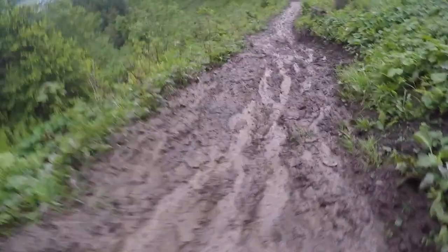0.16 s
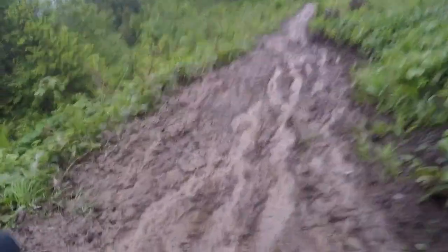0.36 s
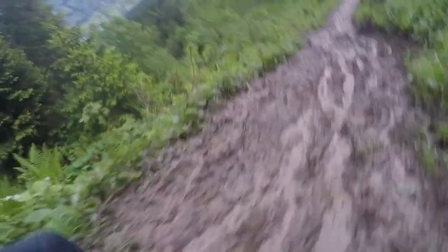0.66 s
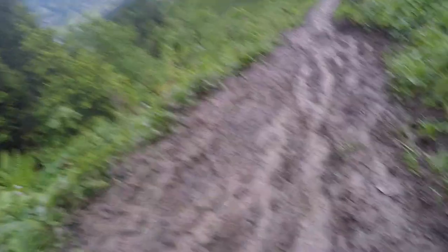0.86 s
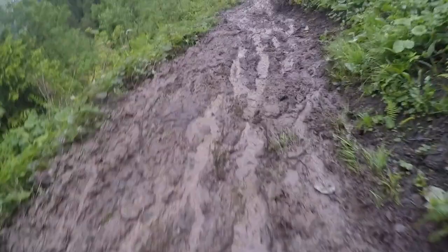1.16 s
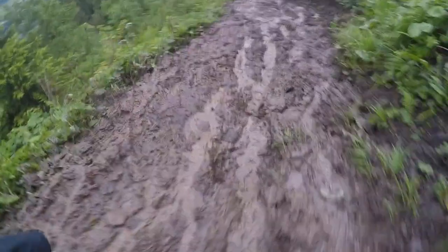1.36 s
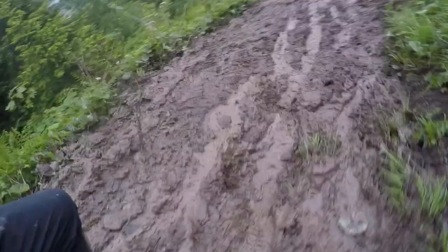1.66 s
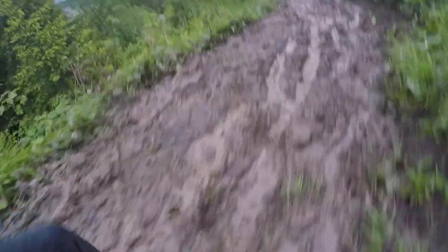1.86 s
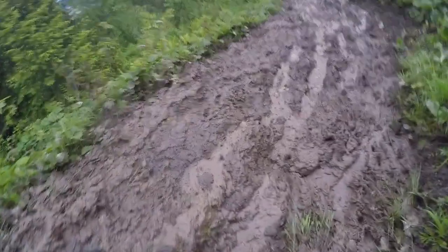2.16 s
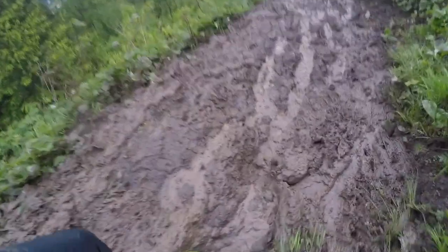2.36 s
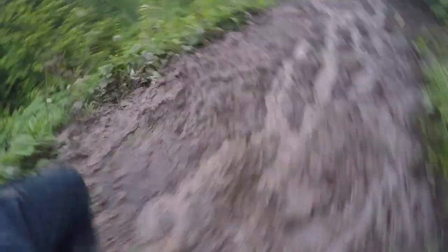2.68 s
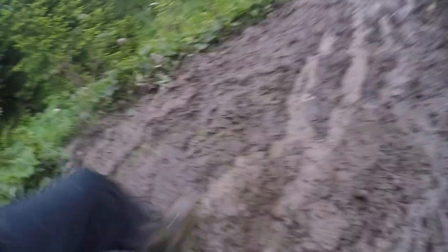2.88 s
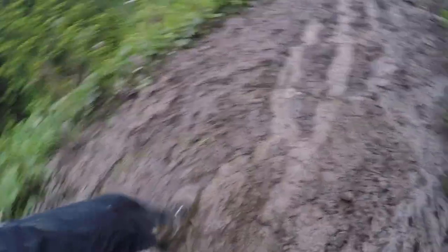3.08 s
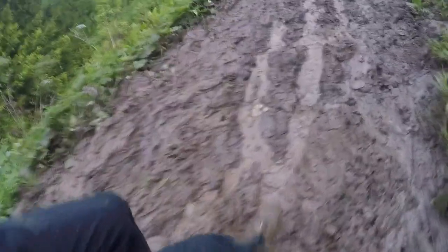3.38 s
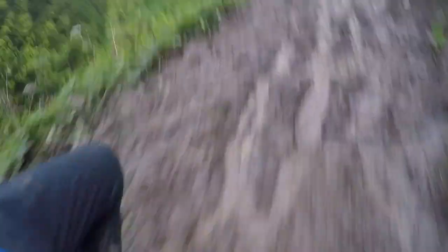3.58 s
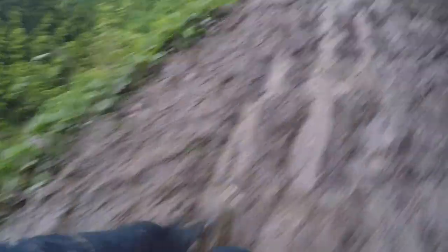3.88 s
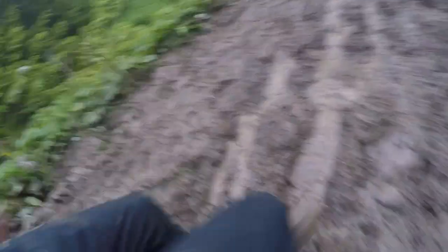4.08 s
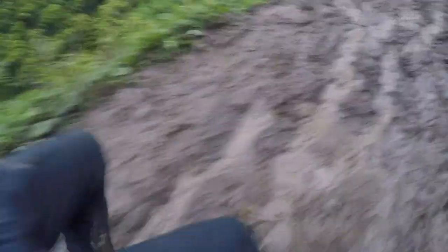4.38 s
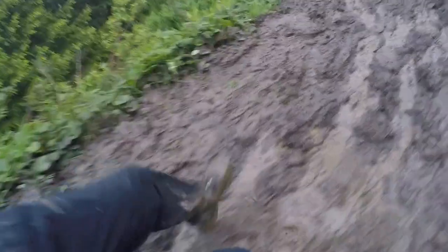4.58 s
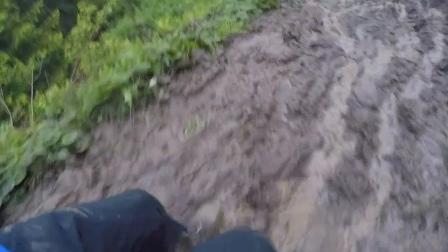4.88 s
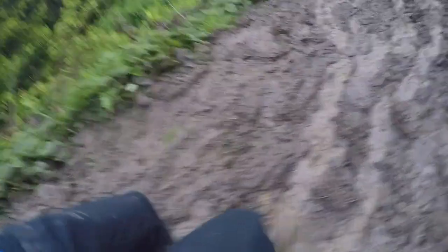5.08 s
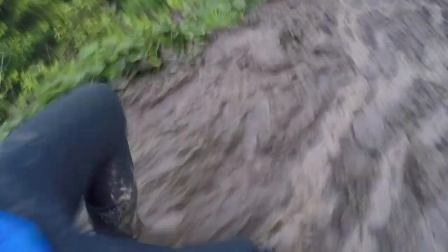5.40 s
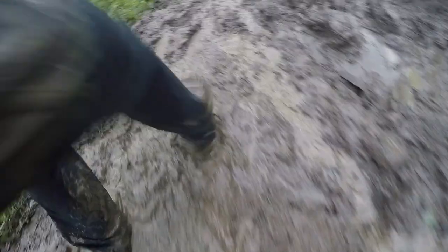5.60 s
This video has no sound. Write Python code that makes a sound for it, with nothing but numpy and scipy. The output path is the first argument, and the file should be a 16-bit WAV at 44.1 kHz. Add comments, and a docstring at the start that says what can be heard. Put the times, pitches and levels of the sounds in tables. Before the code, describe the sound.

Close mono sound from a body-worn camera in a plastic housing, outdoors, without echo. Quiet moving air, faint irregular wet ticking and a barely audible thin whine run throughout. A soft mud step with small hollow pops comes at 0.3 s, then tiny clicks and a light drag near 1.0. A crisp heel-and-sole squelch lands at 1.5, with a strong low plop at 1.6. From 1.95 to 2.25 a jacket rubs the housing, drumming low and swishing faintly, amid small squirts. A sharp wet slap hits at 2.7, and a soft drag follows at 3.1. Steps then quicken: 3.6, a hard short slap at 3.9 with a deep pop, 4.3, 4.8 and 5.4. Each sprays fine bubbles and fizz, pops trapped air in short falling tones, churns dully and jolts the camera with a low thud, then thins into sticky crackles. A last click comes at 5.6.

```python
"""Quick steps through wet mud, heard by a body-worn camera in a plastic housing.
Each boot squeezes out a spray of tiny bursting bubbles made of short rising sines, with noise as fizz.
Trapped air pops as falling tones with noisy snaps; the body's weight churns the mud and jolts the camera.
Softer are single wet clicks, a faint irregular ticking that rises around each step, moving air and a
thin whine. A jacket rubs once along the housing: random slips drum low while noise swishes."""
import sys
import numpy as np
from scipy.fft import rfft, irfft, next_fast_len
from scipy.io import wavfile
from scipy.ndimage import map_coordinates

SR = 44100
rng = np.random.default_rng(int(sys.argv[2]) if len(sys.argv) > 2 else 0)


def store_pcm(level_fs):
    """Save levels as 16-bit WAV."""
    pcm = np.round(np.clip(level_fs, -1, 1) * 32767).astype(np.int16)
    wavfile.write(sys.argv[1], SR, np.atleast_2d(pcm).T)


N = 253134

# What the plastic housing lets through of the wet sounds. Each row: frequency in Hz, gain in dB.
HOUSING = [(200, 3.5), (550, 6.5), (850, -3), (1200, -2.5), (1400, -7), (1680, 4), (2300, -5.5), (2650, 3),
           (3300, -8.5), (4600, 3), (5700, 5), (7300, -9.5), (9000, -14), (14500, -23)]
# A step is heel strike, sole slap, then the body's weight; levels are those before any filter or flutter.
# Each row: heel start in seconds, heel level in dB, heel swell in seconds, air pocket under the heel in dB,
# sole start in seconds, sole level in dB, sole swell in seconds, sole t60 in seconds, bubble pitch in Hz,
# fizz in dB relative to the sole, ooze level in dB, fullest load in seconds after the heel,
# release width in seconds, churn level in dB, jolt level in dB.
STEPS = [(.329, -35, .002, -39, .336, -34.5, .014, 0.12, 2380, -12.5, -48, .03, 0.092, -43, -45),
         (1.48, -24.5, .0011, -27, 1.5, -26, 0.0049, 0.081, 1950, -19, -46, 0.087, 0.086, -38.5, -38.5),
         (2.705, -25, .0023, -16.5, 2.723, -20.5, .0051, 0.025, 2230, -16, -41.5, 0.041, 0.071, -38, -38.5),
         (3.594, -37.5, 0.0037, -23, 3.608, -31.5, 0.012, 0.12, 3520, -14, -49, 0.048, .11, -37, -41.5),
         (3.901, -38.5, .004, -28, 3.9275, -20.5, 0.0011, .016, 4540, -16.5, -46, .1, 0.034, -38, -40.5),
         (4.305, -41.5, .005, -38, 4.326, -33.5, 0.024, 0.061, 3570, -18.5, -47, .095, 0.062, -37, -39),
         (4.807, -34.5, .0007, -26, 4.843, -29, .0063, 0.099, 3870, -22, -56, 0.14, 0.024, -44.5, -37.5),
         (5.401, -44, 0.0045, -22, 5.443, -26.5, .022, .05, 3470, -22, -45, 0.086, 0.062, -36.5, -35)]
# Soft drags: a swinging boot skims the mud, or a trouser leg brushes.
# Each row: start in seconds, spray level in dB, swell in seconds, churn level in dB.
DRAGS = [(.992, -45.5, .02, -54), (1.05, -44.5, 0.029, -46.5), (3.07, -42, .016, -55),
         (4.58, -50, .035, -57), (5.325, -52, .035, -41.5)]
BUILD_UP_S = .04  # width of the rise as the weight comes onto a foot


def amp(db):
    """Amplitude factor of a level in dB."""
    return 10 ** (np.asarray(db) / 20)


def unit(x):
    """Scale a sound to rms 1."""
    return x / np.sqrt(np.mean(x ** 2) + 1e-20)


def clock(length):
    """Sample times in seconds of a short sound."""
    return np.arange(int(length * SR)) / SR


def add(track, s, sound):
    """Lay a sound into a track at time s."""
    part = track[max(round(s * SR), 0):][:len(sound)]
    part += sound[:len(part)]


def wobble(rate, size=N):
    """A smooth random curve, rate knots a second."""
    return map_coordinates(rng.standard_normal(2048), [np.arange(size) * rate / SR], mode="wrap")


def swelling(t, s, build_up, release):
    """A smooth rise to 1 at time s and a smooth fall, each half a bell curve of its own width."""
    width = np.where(t < s, build_up, release)
    return np.exp(-.5 * ((t - s) / width) ** 2)


def colour(x, points):
    """Causal (minimum-phase) filter whose gain follows (Hz, dB) points."""
    m = 2 * next_fast_len(N // 2 + SR // 4)
    hz, db = np.transpose(points)
    gain = amp(np.interp(np.log(np.fft.rfftfreq(m, 1 / SR) + 1), np.log(hz), db))
    # folding the cepstrum onto positive times keeps the filter from sounding early
    cepstrum = irfft(np.log(gain))
    cepstrum[1:m // 2] *= 2
    cepstrum[m // 2 + 1:] = 0
    return irfft(rfft(x, m) * np.exp(rfft(cepstrum)))[:N]


def noise(points):
    """Coloured noise of rms 1."""
    return unit(colour(rng.standard_normal(N), points))


def bubbles(length, count, pitch_hz, scatter, cycles, size_db):
    """Tiny bubbles at random times, each a few dying cycles that rise in pitch; rms 1."""
    t = clock(.012)
    samples = int(length * SR)
    start = rng.integers(0, samples, (count, 1))
    pitch, size = rng.standard_normal((2, count, 1))
    hz = np.clip(pitch_hz * np.exp(scatter * pitch), 300, 14000)
    age = np.minimum(hz * t / cycles, 2)  # 1 when the bubble has died by 60 dB
    loudness = amp(size_db * np.minimum(size, 1.6))
    decay = np.exp(-np.log(1000) * age)
    grains = loudness * decay * np.sin(2 * np.pi * hz * t * (1 + .08 * age))
    places = start + np.arange(len(t))
    return unit(np.bincount(places.ravel(), grains.ravel(), samples)[:samples])


def background():
    """Moving air, faint irregular ticking that rises around each step, and the camera's thin pulsing whine."""
    # Moving air around the camera. Each row: frequency in Hz, relative level in dB per Hz.
    air_spectrum = [(12, -31), (20, 0), (54, -2), (166, -15), (195, -12), (224, -13), (376, -8.5),
                    (441, -12), (508, -15), (596, -19.5), (1400, -31), (1820, -48), (3080, -120)]
    # Hiss of the wet ground. Each row: frequency in Hz, relative level in dB per Hz.
    hiss_spectrum = [(760, -31), (1300, -20), (1430, -0.5), (1650, 10), (1850, 2.5), (2010, 4), (2600, 4),
                     (3310, -3.5), (3980, -2.5), (4950, -1), (5670, 1.5), (7420, -9.5), (10700, -13),
                     (12100, -10.5), (15500, -20.5)]
    air_db, rest_db = -48, -61  # moving air; the wet ground at rest
    stirred_db, settle_s = 3.5, .21  # the ground's rise around each sole slap, width of its settling
    ticks_db = -3.5  # ticking relative to the hiss
    t = np.arange(N) / SR
    stirred = sum(swelling(t, sole_s, BUILD_UP_S, settle_s) for _, _, _, _, sole_s, *_ in STEPS)
    hiss_db = rest_db + stirred_db * stirred
    air = amp(air_db + 1.86 * wobble(21.98)) * noise(air_spectrum)
    hiss = amp(hiss_db + 1.1 * wobble(24)) * noise(hiss_spectrum)
    ticks = bubbles(N / SR, count=1500, pitch_hz=3500, scatter=.5, cycles=26, size_db=5.5)
    ticking = amp(hiss_db + ticks_db) * unit(colour(ticks, HOUSING))
    pulse = 1 + 2.0 * np.sin(2 * np.pi * 30 * t)
    whine = amp(-82.5) * pulse * np.sin(2 * np.pi * 12408 * t)
    return air + hiss + ticking + whine


def weight():
    """Under load the mud churns dully and crackles, and the body's jolt rocks the camera on its strap."""
    # Dull churning of loaded mud. Each row: frequency in Hz, relative level in dB.
    churn_spectrum = [(40, -20), (120, -12), (250, -2), (380, 2.5), (600, -7.5), (900, -25.5), (1500, -29),
                      (4000, -69)]
    # Low thud of the jolted camera. Each row: frequency in Hz, relative level in dB.
    jolt_spectrum = [(12, -16), (28, -9), (50, 1), (80, -15.5), (160, -6.5), (500, -60.5)]
    drag_width_s = .033  # width of the rise and fall of a soft drag
    t = np.arange(N) / SR
    churn, jolt = np.zeros(N), np.zeros(N)
    shake = noise(jolt_spectrum)
    for heel_s, *_, delay, release, churn_db, jolt_db in STEPS:
        load = swelling(t, heel_s + delay, BUILD_UP_S, release)
        rock = np.sin(2 * np.pi * (rng.uniform(24, 48) * t + rng.random()))
        churn += amp(churn_db) * load
        jolt += amp(jolt_db) * load * (1.38 * rock + 1.16 * shake)
    for s, _, swell, churn_db in DRAGS:
        churn += amp(churn_db) * swelling(t, s + swell, drag_width_s, drag_width_s)
    dull = noise(churn_spectrum) * amp(2.7 * wobble(90) - 2.5)
    crackle = bubbles(N / SR, count=2500, pitch_hz=2790, scatter=.55, cycles=16, size_db=4)
    crackle = colour(crackle, HOUSING)
    gurgle = bubbles(N / SR, count=1200, pitch_hz=565, scatter=.39, cycles=8.5, size_db=6.0)
    return churn * (dull + amp(-15) * crackle + amp(-15) * gurgle) + jolt


def pockets():
    """Heel and sole each trap air, and the weight pops a few more: (s, dB, nominal pitch Hz, t60 s)."""
    # Large air pockets that burst on their own.
    # Each row: start in seconds, level before the onset and decay in dB, nominal pitch in Hz, t60 in seconds.
    lone_pockets = [(.318, -20, 302, 0.016), (.4539, -15.5, 567, 0.0052), (1.138, -31, 360, .036),
                    (1.152, -27.5, 340, .041), (1.58, -25, 425, 0.038), (1.598, -7.5, 272, .012),
                    (1.603, -13.5, 530, 0.013), (2.279, -22, 468, 0.012), (2.696, -22, 255, 0.048),
                    (2.812, -21, 388, 0.038), (3.237, -32.5, 373, 0.042), (3.676, -12.5, 343, 0.012),
                    (3.688, -18, 323, .047), (3.931, -7, 248, 0.014), (4.02, -24.5, 433, 0.032),
                    (4.396, -11, 490, 0.0079), (4.407, -16.5, 397, 0.045), (4.479, -23, 474, 0.021),
                    (4.93, -17.5, 505, .019), (5.473, -13.5, 450, 0.014)]
    pocket_hz, pocket_t60_s = 368.4, .045  # air trapped by a boot
    sole_pocket_db = 3  # under the sole, relative to the slap
    # stray pockets under load: level over the churn, spread in time, spread of log pitch
    stray_db, stray_spread_s, stray_scatter = 5.5, .03, .23
    rows = list(lone_pockets)
    for heel_s, _, _, pocket_db, sole_s, sole_db, swell, *_, delay, _, churn_db, _ in STEPS:
        rows.append((heel_s, pocket_db, pocket_hz, pocket_t60_s))
        rows.append((sole_s + swell / 2, sole_db + sole_pocket_db, pocket_hz, pocket_t60_s))
        for when, pitch in rng.standard_normal(size=(3, 2)):
            s = heel_s + delay + stray_spread_s * when
            hz = pocket_hz * np.exp(stray_scatter * pitch)
            rows.append((s, churn_db + stray_db, hz, pocket_t60_s / 2))
    return rows


def plops():
    """An air pocket rings briefly, falling in pitch as it opens; small pockets snap the mud skin harder."""
    # Tearing of the mud skin. Each row: frequency in Hz, gain in dB.
    skin = [(100, 5), (600, 3), (1100, -3), (1400, -12), (1700, -5), (2500, -23), (6000, -38), (12000, -48)]
    snap_db = -2.5  # at a nominal 400 Hz, relative to the ring and before the skin's filter
    tones, snaps = np.zeros(N), np.zeros(N)
    t = clock(.12)
    for s, db, hz, t60 in pockets():
        pitch = hz * (.927 + .5 * np.exp(-t / .0014))
        life = (1 - np.exp(-t / .0007)) * amp(-60 * t / t60)
        add(tones, s, amp(db) * life * np.sin(2 * np.pi * np.cumsum(pitch) / SR))
        smallness = (hz / 400) ** 2.1
        add(snaps, s, amp(db + snap_db) * smallness * life * rng.standard_normal(len(t)))
    return tones + colour(snaps, skin)


def splashes():
    """Every squeeze of mud and soft drag, as (s, dB, swell s, t60 s, bubble pitch Hz, fizz relative dB)."""
    # Mud squirting from under a boot or flicked off it; levels are those before any filter.
    # Each row: start in seconds, level in dB, swell in seconds, t60 in seconds, bubble pitch in Hz,
    # fizz in dB relative to the level.
    squirts = [(1.578, -33.5, .0046, 0.14, 600, -27), (1.594, -30.5, 0.0049, 0.06, 3440, -14),
               (1.609, -44, .028, .47, 2970, -25), (1.903, -32, 0.005, 0.026, 1960, -19),
               (2.235, -40.5, 0.0011, 0.17, 3980, -13), (2.735, -31.5, 0.0027, .1, 3700, -18),
               (3.067, -40, 0.001, 0.018, 6000, -4.5), (3.687, -34, 0.0062, 0.064, 3370, -19),
               (3.726, -51, .007, .06, 6100, 2), (3.936, -31, 0.001, .045, 3050, -19),
               (4.395, -34.5, .0033, 0.094, 1200, -35), (4.703, -41, .001, 0.077, 3920, -21),
               (4.929, -33.5, 0.0058, .027, 880, -36), (5.3166, -32, 0.0011, 0.0056, 5240, -30),
               (5.447, -26.5, .0035, 0.11, 1330, -22)]
    # t60 in seconds, bubble pitch in Hz, fizz in relative dB
    heel_tail = (.048, 3900, -13)  # a short bright splash
    drag_tail = (.22, 2280, -15)  # a soft drag
    # mud creeping out round the planted boot: the same, after a swell in seconds
    ooze_tail = (.023, .41, 2900, -15)
    rows = list(squirts)
    for heel_s, heel_db, heel_swell, _, sole_s, sole_db, swell, t60, pitch_hz, fizz_db, ooze_db, *_ in STEPS:
        rows.append((heel_s, heel_db, heel_swell, *heel_tail))
        rows.append((sole_s, sole_db, swell, t60, pitch_hz, fizz_db))
        rows.append((sole_s, ooze_db, *ooze_tail))
    for s, db, swell, _ in DRAGS:
        rows.append((s, db, swell, *drag_tail))
    return rows


def squelches():
    """Each squeeze sprays dense bubbles and fizz, then thins out into separate sticky pops as it dies."""
    # Finest spray. Each row: frequency in Hz, gain in dB.
    fizz_spectrum = [(1500, -41), (5000, 4), (7500, -0.5), (9000, 4), (11000, -6), (14000, -6)]
    scatter, life_s = .483, .0041  # spread of log pitch, t60 of a middling bubble in the spray
    wet, fizz = np.zeros(N), np.zeros(N)
    t = clock(.2)
    for s, db, swell, t60, pitch_hz, fizz_db in splashes():
        spray = bubbles(.2, count=400, pitch_hz=pitch_hz, scatter=scatter,
                        cycles=pitch_hz * life_s, size_db=5)
        pops = bubbles(.2, count=60, pitch_hz=.8 * pitch_hz, scatter=.45,
                       cycles=2 * pitch_hz * life_s, size_db=4)
        flow = np.minimum(t / swell, 1) * amp(-60 * np.maximum(t - swell, 0) / t60)
        stick = np.sqrt(flow) * (1 - flow) * (t > swell)  # fullest while the flow dies
        flutter = amp(2 * wobble(220, size=len(t)))
        burst = flow * flutter * (spray + amp(-10) * rng.standard_normal(len(t)))
        burst += .4 * stick * pops
        # every burst carries the energy of its flow
        add(wet, s, amp(db) * burst * np.linalg.norm(flow) / np.linalg.norm(burst))
        add(fizz, s, amp(db + fizz_db) * flow * rng.standard_normal(len(t)))
    return colour(wet, HOUSING) + colour(fizz * amp(.66 * wobble(400)), fizz_spectrum)


def clicks():
    """Single larger bubbles snap in the wet surface, each a dying sine with a burst of noise."""
    # Single wet clicks. Each row: start in seconds, ring level before the housing in dB, pitch in Hz.
    single_bubbles = [(.5496, -43, 1520), (0.818, -46.5, 1600), (0.932, -34, 1870), (1.9913, -34, 3790),
                      (2.2557, -37, 5600), (3.7953, -42.5, 1700), (4.075, -40.5, 1680),
                      (5.6218, -33.5, 1550)]
    out = np.zeros(N)
    t = clock(.04)
    for s, db, hz in single_bubbles:
        ring = amp(-60 * t / .016) * np.sin(2 * np.pi * hz * t)
        snap = amp(-5 - 60 * t / .01) * rng.standard_normal(len(t))
        add(out, s, amp(db) * (ring + snap))
    return colour(out, HOUSING)


def jacket():
    """Cloth sticks and slips on the housing, which drums low while the weave swishes."""
    # Drumming of the housing. Each row: frequency in Hz, relative level in dB per Hz.
    drum_spectrum = [(60, -41), (120, -13), (180, -2.5), (260, -9), (350, 5), (430, -1), (560, -6),
                     (700, -20.5), (900, -24), (1400, -46.5)]
    # Swish of the weave. Each row: frequency in Hz, relative level in dB per Hz.
    swish_spectrum = [(820, -54), (1400, -12), (1680, -16), (2010, -3), (2180, 1), (3430, -1.5),
                      (4730, 6.5), (7660, -17), (9090, -12), (10100, -24), (13100, -19), (14400, -22),
                      (15500, -25)]
    start_s, attack_s, hold_s, release_s = 1.942, .052, .15, .13  # one pass of the jacket
    drum_db, swish_db = -33, -54
    sag_db_per_s = -27  # it drums less as the pressure eases
    t = np.arange(N) / SR - start_s
    contact = np.interp(t, np.cumsum([0, attack_s, hold_s, release_s]), [0, 1, 1, 0])
    pressure = contact * amp(sag_db_per_s * np.maximum(t - attack_s, 0))
    slips = (rng.random(N) < 900 / SR) * rng.choice([-1, 1], N)  # about 900 a second
    drumming = amp(drum_db) * pressure * unit(colour(slips, drum_spectrum))
    swish = amp(swish_db) * contact * noise(swish_spectrum)
    return drumming + swish


def scene():
    """All layers together, as one channel."""
    return (squelches() + clicks() + plops() + weight() + jacket() + background())[None]


def record(dry):
    """The camera keeps next to nothing above its band limit."""
    top_hz = 15600
    m = next_fast_len(N + SR // 2)
    gain = 1 / (1 + (np.fft.rfftfreq(m, 1 / SR) / top_hz) ** 120)
    return irfft(rfft(dry, m) * gain, m)[..., :N]


dry = scene()
out = record(dry)
store_pcm(out)
```